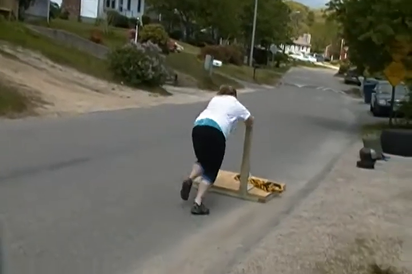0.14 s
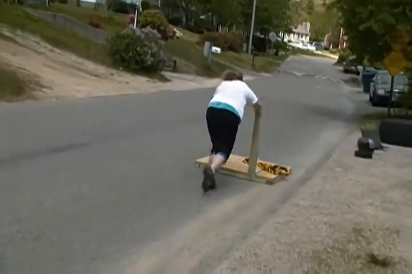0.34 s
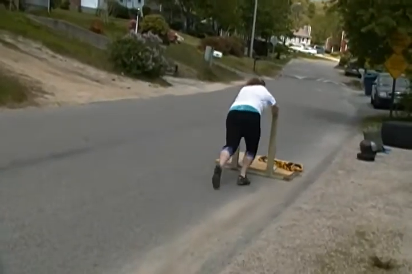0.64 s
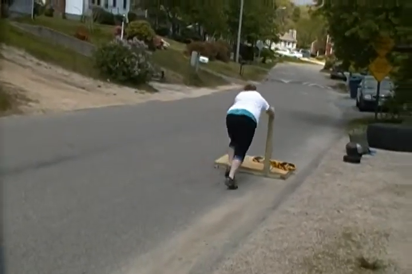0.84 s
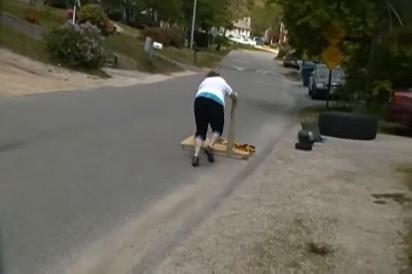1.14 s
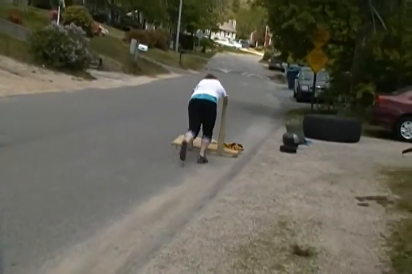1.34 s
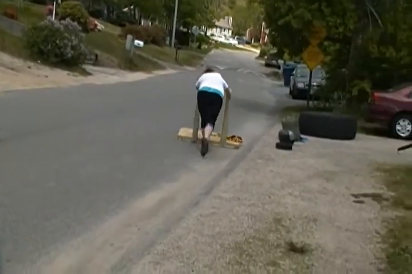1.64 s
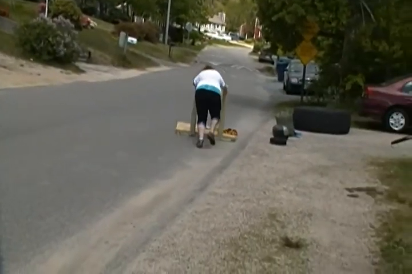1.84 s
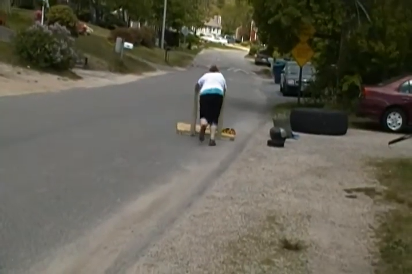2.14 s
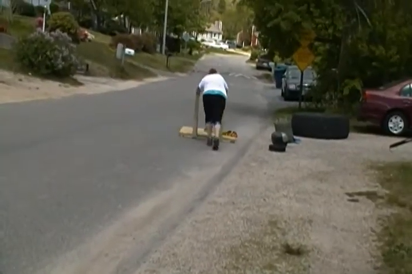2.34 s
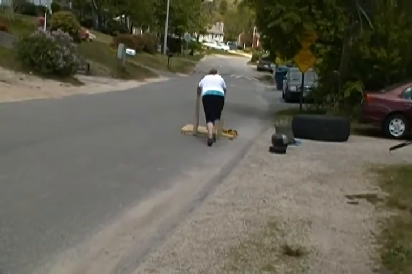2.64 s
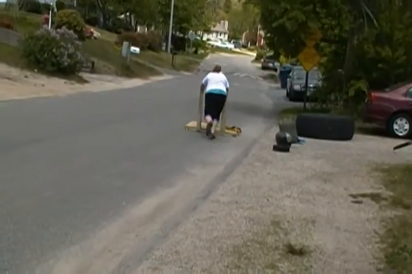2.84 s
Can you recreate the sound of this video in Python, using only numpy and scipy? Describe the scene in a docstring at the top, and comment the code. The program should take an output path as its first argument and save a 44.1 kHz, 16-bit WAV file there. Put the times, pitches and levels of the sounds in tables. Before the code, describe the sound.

Wooden push sled grinding steadily over a gritty street, with small clicks, knocks and wind.

```python
"""Wooden sled on asphalt

A push sled scrapes away along a street, heard from a few metres behind. Its runners grind over
countless grains of road, loose stones and sand crack under the wood, and the deck drones and knocks.
Wind puffs on the microphone at the start and rumbles on it through the second half."""
import sys
import numpy as np
from scipy import signal
from scipy.fft import rfft, irfft, next_fast_len
from scipy.io import wavfile
from scipy.ndimage import uniform_filter1d

SR = 44100
rng = np.random.default_rng(int(sys.argv[2]) if len(sys.argv) > 2 else 0)


def put_to_file(sound):
    """Save the sound as 16-bit audio at rate SR, in the file named by the first command-line argument."""
    columns = np.atleast_2d(sound).T  # one column per channel
    safe = np.clip(columns, -1, 1)
    whole_steps = np.round(safe * 32767)
    wavfile.write(sys.argv[1], SR, whole_steps.astype(np.int16))


N = 131859


# Fader moves for the runners' low grind, woody rasp and fine grit.
# Each row: time in seconds, relative level in dB.
GRIND_FADER = [(0, -15.5), (.16, -20), (.23, -14), (.47, -15), (.6, -14.5), (.68, -16.5), (.88, -15.5),
               (.95, -28), (.98, -17), (1.08, -17), (1.13, -18.5), (1.29, -22.5), (1.35, -19), (1.55, -19),
               (1.66, -17.5), (1.74, -18), (1.9, -21.5), (2.1, -19.5), (2.26, -21.5), (2.37, -19.5),
               (2.58, -23.5), (2.69, -18.5), (2.81, -24), (2.99, -22)]
RASP_FADER = [(0, -18.5), (.38, -20), (.55, -23), (.87, -20.5), (.93, -27), (1.01, -19), (1.1, -20.5),
              (1.2, -23), (1.28, -23.5), (1.42, -22.5), (1.7, -23.5), (2.1, -22.5), (2.58, -25.5),
              (2.68, -21), (2.81, -25.5), (2.87, -24.5), (2.99, -27.5)]
GRIT_FADER = [(0, -21), (.1, -27), (.33, -20), (.46, -28), (.66, -29.5), (.71, -27), (.78, -29),
              (.85, -23.5), (.95, -32.5), (1.0, -23.5), (1.08, -24.5), (1.2, -28), (1.66, -27.5),
              (1.76, -27.5), (2.0, -27.5), (2.5, -29), (2.7, -27), (2.81, -31), (2.99, -29.5)]
# Tone of the same three layers. Each row: frequency in Hz, relative level in dB.
GRIND_EQ = [(70, -18.5), (150, -4.5), (195, -11), (230, -3), (290, -1.5), (345, -3.5), (430, -2),
            (590, -8.5), (820, -6), (1050, -11.5), (1300, -17), (2000, -27), (5000, -69)]
RASP_EQ = [(700, -15), (1250, -7.5), (1480, 2.5), (1850, -1), (2150, -5.5), (2700, -16), (5000, -43.5)]
GRIT_EQ = [(1200, -20.5), (2400, 3), (3200, 3.5), (4200, 1.5), (5300, 1), (6300, -3), (7200, -6),
           (8800, -13.5), (9600, -23), (11000, -59), (12200, -89)]

def runners():
    """Grains of road strike the wood in three layers, all shaken by the same uneven stick and slip."""
    judder = wander(rate_hz=84)
    grind = rub(GRIND_EQ, per_s=2700, spread_db=2.5, side_db=-53) * undb(curve(GRIND_FADER))
    rasp = rub(RASP_EQ, per_s=2000, spread_db=1.5, side_db=-18.5) * undb(curve(RASP_FADER) - 3.5)
    grit = rub(GRIT_EQ, per_s=12000, spread_db=3, side_db=-9) * undb(curve(GRIT_FADER) - 2.5)
    return sum(layer * unit(undb(judder_db * judder))
               for layer, judder_db in ((grind, 1.43), (rasp, 1.5), (grit, 1.9)))


def rub(eq, per_s, spread_db, side_db):
    """Friction as a stream of tiny impacts, shaped by an EQ and spread in stereo."""
    mid, side = (unit(colour(grains(per_s, spread_db), eq)) for _ in range(2))
    return stereo(mid, side, side_db)


# Stones cracking under a runner. Each row: start in seconds, crunch length in seconds, wood pitch in Hz,
# wood level in dB, stone pitch in Hz, stone level in dB, splinter level in dB. Levels are relative.
STONE_CRACKS = [(0.059, 0.0063, 1850, -11.5, 3150, -18.5, -34), (0.112, .003, 1530, -21, 3550, -18, -32),
                (0.138, 0.007, 1640, -13, 4400, -21, -28), (.2043, 0.0035, 2090, -28, 3120, -13, -20),
                (0.287, 0.0044, 1540, -12, 3500, -17.5, -18), (0.343, .018, 1550, -12.5, 4900, -26, -31),
                (0.364, .003, 2090, -17, 3090, -7.5, -19), (.371, .005, 1720, -17, 3200, -18, -28),
                (0.454, .002, 1700, -23, 2900, -20, -36), (.511, 0.0026, 1600, -22, 4500, -27, -29),
                (.5252, 0.0021, 1790, -13, 4000, -17, -26), (0.629, .004, 1590, -15, 5500, -28, -26),
                (.6946, .004, 1720, -21, 5600, -25, -22), (0.7114, 0.0034, 1520, -13, 3770, -17, -36),
                (.7246, .003, 1770, -12, 2700, -14, -25), (.7726, 0.0049, 1560, -11.5, 3130, -21, -23),
                (0.826, 0.0042, 1460, -16, 4350, -15.5, -21), (0.838, 0.0045, 1640, -25, 6300, -22, -23),
                (0.866, 0.001, 1700, -25, 5370, -22, -25), (0.881, 0.0021, 1390, -26, 3560, -18.5, -31),
                (0.991, .006, 1940, -32, 3300, -21, -33), (1.072, 0.011, 1400, -19, 4520, -19, -38),
                (1.096, .0015, 1780, -24, 5000, -24, -35), (1.261, 0.0022, 1780, -13, 5030, -30, -21),
                (1.312, .0014, 1440, -23, 4800, -26, -35), (1.3245, 0.0033, 1600, -21.5, 4130, -25, -30),
                (1.3653, 0.0054, 1710, -15.5, 4200, -25, -30), (1.417, 0.0047, 1650, -11.5, 4400, -20, -22),
                (1.427, .004, 1950, -18, 5400, -25, -21), (1.47, 0.0013, 1400, -30, 4500, -21, -19),
                (1.513, .003, 2250, -28, 3200, -15, -33), (1.537, 0.0053, 1900, -16.5, 5000, -24, -22),
                (1.595, 0.002, 1730, -17, 3300, -19, -32), (1.609, 0.005, 1890, -14.5, 3200, -11.5, -31),
                (1.624, 0.009, 1600, -22, 6800, -24, -27), (1.65, 0.0055, 1400, -18, 3200, -29, -26),
                (1.695, .004, 1650, -16, 5200, -28, -22.5), (1.719, 0.0021, 1500, -30, 5170, -16.5, -25),
                (1.8035, 0.0025, 1720, -12.5, 3960, -18, -20), (1.826, .002, 1900, -25, 4600, -19, -30),
                (1.836, 0.0014, 1490, -18, 5200, -21, -24), (1.845, 0.0013, 2230, -32, 5200, -25, -25),
                (1.873, 0.003, 2040, -14, 3950, -15, -11.5), (1.8885, .0022, 1820, -13, 3700, -18, -23),
                (1.937, .0013, 1740, -23, 4060, -20, -33), (2.015, 0.0066, 1800, -17.5, 3700, -29, -27),
                (2.065, 0.0018, 2000, -19, 3900, -22.5, -33), (2.1238, .0014, 2200, -21, 5170, -26, -11.5),
                (2.13, 0.0061, 1800, -19, 5000, -24, -27), (2.18, 0.0067, 1460, -29, 2950, -18.5, -27),
                (2.2716, 0.0035, 1690, -17.5, 4000, -19, -19), (2.276, .006, 1800, -11.5, 4000, -15, -27),
                (2.343, 0.0036, 1460, -14, 3230, -17, -36), (2.404, 0.0058, 1620, -17.5, 3500, -31, -35),
                (2.5556, 0.0016, 2000, -24, 5000, -24.5, -39), (2.657, 0.0043, 1720, -21, 4000, -29, -34),
                (2.675, 0.006, 1480, -16, 3140, -22, -41), (2.849, 0.007, 1420, -22, 2930, -21, -31),
                (2.8588, 0.0041, 1360, -14, 3680, -12, -33), (2.867, 0.0079, 1770, -16, 2980, -14, -24),
                (2.885, 0.0019, 1790, -32, 3800, -14, -43), (2.957, .0018, 1800, -6.5, 5000, -12.5, -32)]

def stones():
    """Loose stones snap: each rings the runner where it is caught, rings at its own pitch and splinters."""
    def note(push, hz, width_hz):
        return ring(ring(push, hz, width_hz), hz, .47 * hz)

    mid, side = np.zeros((2, N))
    for start, length_s, wood_hz, wood_db, stone_hz, stone_db, splinter_db in STONE_CRACKS:
        for track in (mid, side):
            push = strike(length_s)
            wood = note(push, wood_hz, width_hz=226)
            overtone = note(push, 1.625 * stone_hz, width_hz=470)
            stone = note(push, stone_hz, width_hz=470) + undb(-13) * overtone
            splinter = ring(push, hz=5240, width_hz=2100)
            for sound, db in ((wood, wood_db), (stone, stone_db), (splinter, splinter_db)):
                add(track, start, peak_level(sound, db + .5, window_s=.00088))
    return soften(stereo(mid, side, side_db=-27))


def sand(per_s=200, low_hz=1680, high_hz=6700, ring_cycles=2.1):
    """Sand grains snap dryly, each at its own pitch; most are small, and all ride the grit's fader."""
    snaps, t = np.zeros(N), np.arange(512) / SR
    for when, pitch, size in rng.random((int(per_s * N / SR), 3)):
        hz = low_hz * (high_hz / low_hz) ** pitch
        snap = np.sin(2 * np.pi * hz * t) * np.exp(-2 * t * hz / ring_cycles)
        add(snaps, when * N / SR, snap * undb(10 * size ** 2 - 2 * pitch))
    return unit(soften(snaps)) * undb(curve(GRIT_FADER) - 7)


# Bumps in the road. Each row: start in seconds, frame thud level in dB, plank knock level in dB.
BUMP_HITS = [(.043, -17, -26), (.128, -16, -21), (.140, -12, -19), (.199, -10.5, -31), (.233, -11, -18),
             (.441, -8, -16.5), (.467, -18, -20), (.496, -15, -17), (.519, -21, -19), (.576, -20, -21),
             (.628, -15, -15), (.719, -15, -20), (0.775, -11, -23), (0.881, -27, -25), (.976, -19, -20),
             (.992, -11, -13), (1.057, -10, -17), (1.073, -9, -20), (1.371, -14.5, -16), (1.422, -13, -13),
             (1.5946, -9, -11), (1.611, -19, -11), (1.654, -9.5, -14), (1.68, -12.5, -25),
             (2.019, -22, -19.5), (2.037, -29, -21), (2.142, -19, -19.5), (2.342, -22, -18),
             (2.382, -21, -19.5), (2.676, -19, -19)]
# The frame's low resonances. Each row: pitch in Hz, width in Hz, relative level in dB.
FRAME_MODES = [(238, 70, -2), (296, 104, 3), (389, 72, -4.5)]

def bumps(plank_hz=825, plank_width_hz=206):
    """A runner catches on a bump: the frame thuds and the plank knocks."""
    hits = np.zeros(N)
    for start, thud_db, knock_db in BUMP_HITS:
        push = strike(length_s=.004)
        thud = sum(undb(db) * ring(ring(push, hz, width), hz, 4 * width) for hz, width, db in FRAME_MODES)
        knock = ring(ring(push, plank_hz, plank_width_hz), plank_hz, 2 * plank_width_hz)
        for sound, db in ((thud, thud_db), (knock, knock_db)):
            add(hits, start, peak_level(sound, db, window_s=.0066))
    return hits


# Fader moves for the deck's drone and the frame's rumble. Each row: time in seconds, relative level in dB.
DECK_FADER = [(0, -20), (.25, -19), (.5, -28), (.73, -20), (.8, -12.5), (.86, -19), (.92, -11), (.98, -19),
              (1.27, -20.5), (1.5, -16.5), (1.72, -16), (2.18, -18.5), (2.28, -28), (2.46, -15),
              (2.62, -21.5), (2.72, -11), (2.8, -20), (2.99, -27)]
FRAME_FADER = [(0, -14.5), (.3, -62), (.47, -17.5), (.56, -24), (.68, -18), (.93, -40), (1.06, -22.5),
               (1.27, -24.5), (1.42, -21.5), (1.5, -14.5), (1.58, -19.5), (1.655, -15.5), (1.73, -22.5),
               (1.82, -16.5), (1.9, -30), (2.15, -25), (2.5, -29.5), (2.68, -22.5), (2.83, -35),
               (2.99, -37)]

def sled_body():
    """The deck drones and the frame rumbles about an octave higher."""
    deck = drone(hz=107.4, width_hz=31.4, side_db=-22.5) * undb(curve(DECK_FADER) - 1)
    frame = drone(hz=228.4, width_hz=53, side_db=-29.05) * undb(curve(FRAME_FADER) - .5)
    return deck + frame


def drone(hz, width_hz, side_db):
    """A low mode of the sled, kept sounding by friction that evens out its swings."""
    mid, side = (unit(ring(ring(noise, hz, width_hz), hz, 2 * width_hz))
                 for noise in rng.standard_normal((2, N)))
    swing = uniform_filter1d(abs(signal.hilbert(mid)), size=400) + .053
    return stereo(unit(mid / swing ** .35), side, side_db)


# The gusts. Each row: time in seconds, level in dB.
WIND_FADER = [(0, -22.5), (.07, -22), (.16, -40), (.3, -38), (.7, -53), (1.02, -44), (1.3, -45),
              (1.72, -42), (1.82, -19), (1.89, -31), (2.1, -17.5), (2.54, -19), (2.62, -25), (2.99, -22.5)]
# Their bass-heavy tone. Each row: frequency in Hz, relative level in dB.
WIND_EQ = [(15, -19), (30, -1.5), (55, -2), (90, -6), (160, -7), (250, -19), (400, -31), (1500, -63.5)]

def wind():
    """Eddies buffet the two microphone ports."""
    mid, side = (unit(colour(noise, WIND_EQ)) for noise in rng.standard_normal((2, N)))
    return stereo(mid, side, side_db=-2.5) * undb(curve(WIND_FADER))


def street(x, t60_s=.18, wet_db=-18):
    """Cars, trees and banks scatter back a faint, short tail."""
    t = np.arange(SR // 2) / SR
    tail = rng.standard_normal((2, len(t))) * np.exp(-np.log(1000) * t / t60_s) * (t > .01)
    tail /= np.sqrt(np.sum(tail ** 2, axis=1, keepdims=True))
    return x + undb(wet_db) * signal.fftconvolve(x, tail, axes=1)[:, :N]


def grains(per_s, spread_db):
    """Tiny impacts at random moments, a few much larger than the rest."""
    present = rng.random(N) < per_s / SR
    polarity = rng.choice([-1, 1], N)
    return present * polarity * undb(spread_db * np.minimum(rng.exponential(size=N), 4))


def strike(length_s):
    """A first impact, then a dying chatter of smaller ones; in a long crunch the chatter dominates."""
    t = np.arange(4096) / SR
    push = rng.standard_normal(len(t)) ** 3 * np.exp(-(t / length_s) ** 2)
    push[0] += 30 * min(1, .003 / length_s)
    return push


def wander(rate_hz):
    """Smooth random motion with an rms of one."""
    span = int(SR / rate_hz)
    drift = uniform_filter1d(rng.standard_normal(N), span, mode="wrap")
    return unit(uniform_filter1d(drift, span, mode="wrap"))


def colour(x, eq):
    """Minimum-phase EQ through (Hz, dB) points, so attacks have no pre-ring."""
    hz, db = np.array(eq).T
    size = 2 * next_fast_len(N)
    bin_hz = np.maximum(np.arange(size // 2 + 1) * SR / size, 1)
    gain = undb(np.interp(np.log(bin_hz), np.log(hz), db))
    cepstrum = irfft(np.log(gain))
    cepstrum[1:size // 2] *= 2
    cepstrum[size // 2 + 1:] = 0
    return irfft(rfft(x, size) * np.exp(rfft(cepstrum)))[:N]


def ring(x, hz, width_hz):
    """A damped resonance, gain one at its centre."""
    return signal.lfilter(*signal.iirpeak(hz, hz / width_hz, fs=SR), x)


def soften(x, cutoff_hz=8520):
    """Roll the top off a crack."""
    return signal.sosfilt(signal.butter(4, cutoff_hz, fs=SR, output="sos"), x)


def stereo(mid, side, side_db):
    """Left and right from a common part and a diffuse part."""
    return mid + undb(side_db) * side * np.array([[1], [-1]])


def peak_level(x, db, window_s):
    """Scale a hit so that its loudest moment has the given level."""
    power = uniform_filter1d(x ** 2, int(window_s * SR), mode="constant")
    return x * undb(db) / np.sqrt(power.max())


def add(track, start_s, sound):
    """Lay a short sound into a track."""
    i = int(start_s * SR)
    track[i:i + len(sound)] += sound[:max(N - i, 0)]


def curve(rows):
    """Join (seconds, value) rows by straight lines."""
    return np.interp(np.arange(N) / SR, *np.array(rows).T)


def undb(db):
    """Decibels to gain."""
    return 10 ** (np.asarray(db) / 20)


def unit(x):
    """Scale to an rms of one."""
    return x / np.sqrt(np.mean(x ** 2) + 1e-18)


def scene():
    """Knocks, drones and wind stay dry; the scraping and cracking scatter off the street."""
    return bumps() + sled_body() + wind() + street(runners() + stones() + sand())


def record(dry, full_scale=.88, top_hz=11400):
    """The right microphone port is brighter; the recorder clips the tallest peaks and cuts the top."""
    left, right = dry
    left_sheen, right_sheen = ring(dry, hz=8700, width_hz=1102.5)
    heard = np.array([left - left_sheen / 2, right + undb(-2) * right_sheen])
    clipped = np.clip(heard, -full_scale, full_scale)
    return signal.sosfilt(signal.ellip(10, .2, 90, top_hz, fs=SR, output="sos"), clipped)


dry = scene()
out = record(dry)
put_to_file(out)
```